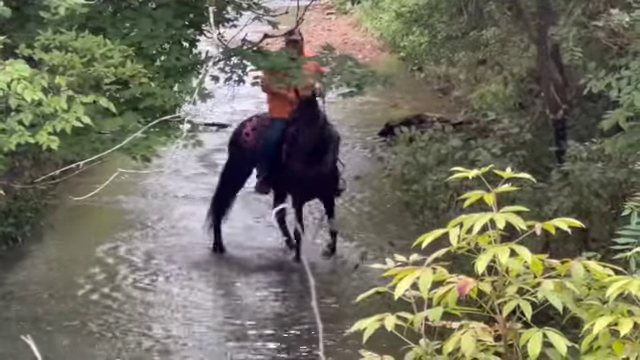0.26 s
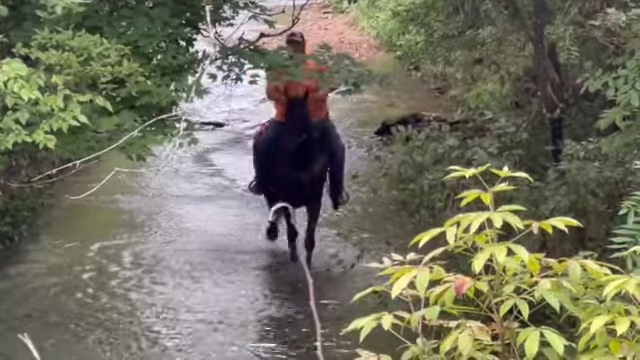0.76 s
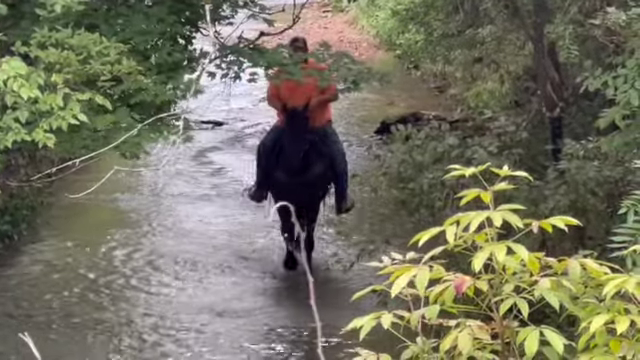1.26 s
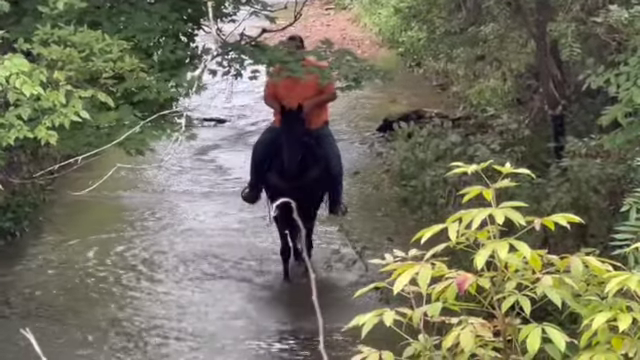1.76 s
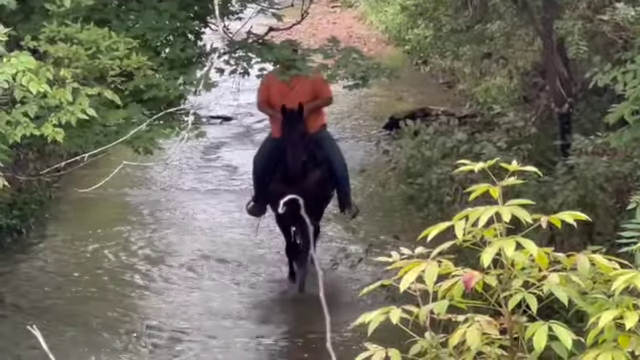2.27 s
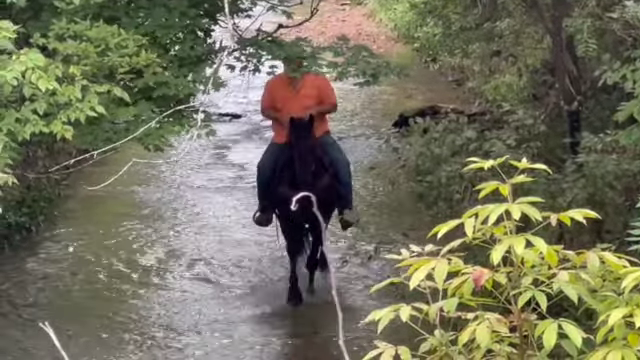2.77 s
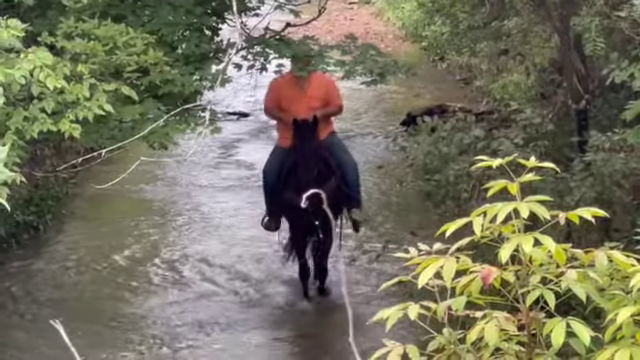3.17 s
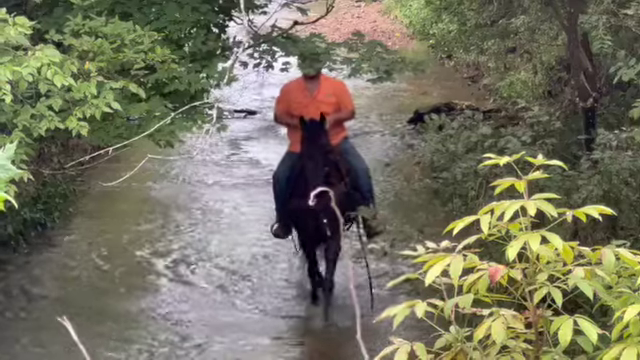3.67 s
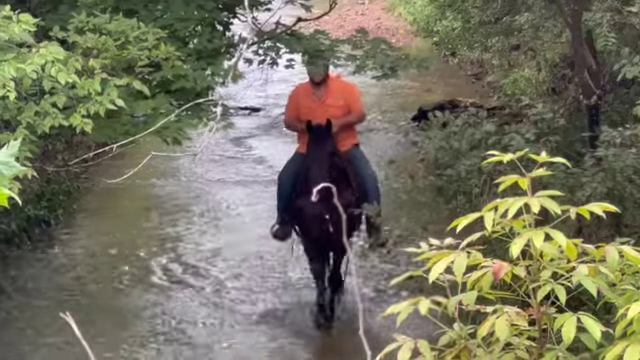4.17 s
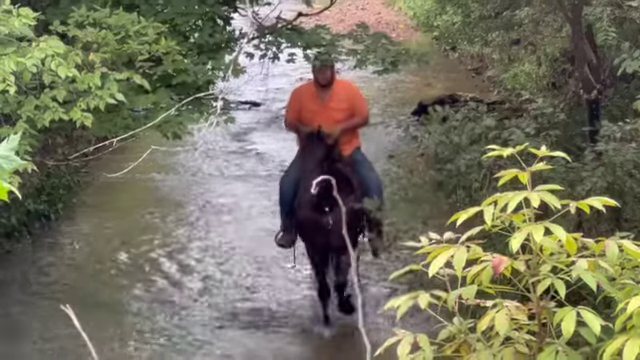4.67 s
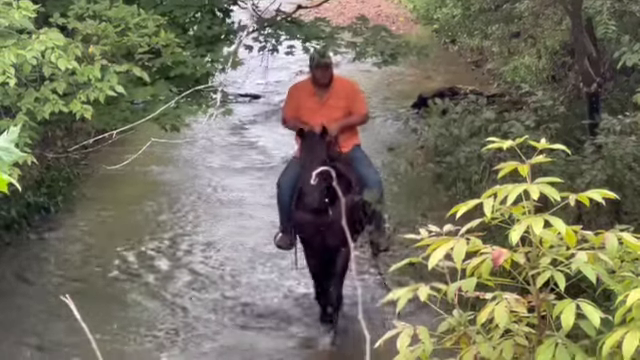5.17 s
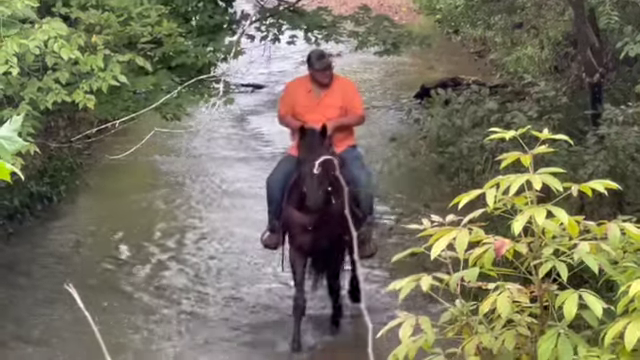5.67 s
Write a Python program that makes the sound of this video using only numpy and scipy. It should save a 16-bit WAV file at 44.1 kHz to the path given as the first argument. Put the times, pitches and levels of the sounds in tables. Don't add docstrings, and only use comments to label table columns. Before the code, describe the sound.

A horse walks through a shallow stony creek, hooves plopping and splashing over babbling water while insects drone steadily in the trees.

```python
import sys
import numpy as np
from scipy import signal
from scipy.fft import rfft, irfft, next_fast_len
from scipy.io import wavfile
from scipy.ndimage import uniform_filter1d

SR = 44100
rng = np.random.default_rng(int(sys.argv[2]) if len(sys.argv) > 2 else 0)


def gain_from_db(level_db):
    decades = np.asarray(level_db, float) / 20
    return 10 ** decades


def log_audio(samples):
    frames = np.atleast_2d(samples).T
    limited = np.clip(frames, -1, 1)
    pcm = np.round(limited * 32767).astype(np.int16)
    wavfile.write(sys.argv[1], SR, pcm)


N = 260631


def evened(x):
    return x / np.sqrt(np.mean(x ** 2) + 1e-20)


def wander(size):
    return evened(uniform_filter1d(uniform_filter1d(rng.standard_normal(N), size=size), size=size))


def read(points, hz):
    f, value = np.transpose(points)
    return np.interp(np.log(hz + 1), np.log(f + 1), value)


def add(mix, s, sound):
    part = mix[round(s * SR):][:len(sound)]
    part += sound[:len(part)]


def hiss(shape, patchy_db, flicker_db, size=512):
    # frequency in Hz, likeness of left and right from 0 to 1
    likeness = [(60, 0.99), (300, 0.94), (700, 0.91), (1400, 0.79), (2100, 0.93), (2700, 1), (3500, 0.99),
                (8500, 1), (9300, 0.95), (15000, 1)]
    frames, hz = 4 * N // size + 5, np.fft.rfftfreq(size, 1 / SR)
    a, b, c, d, patches = rng.standard_normal((frames, len(hz), 5)).T
    patches = uniform_filter1d(patches, size=6, axis=0)
    patches = evened(uniform_filter1d(patches, size=12, axis=1))
    flicker = evened(uniform_filter1d(rng.standard_normal(frames), size=4))
    same = np.clip(read(likeness, hz), 0, 1)[:, None]
    left = a + 1j * b
    right = same * left + np.sqrt(1 - same ** 2) * (c + 1j * d)
    level_db = read(shape, hz)[:, None] + patchy_db * patches + flicker_db * flicker
    z = np.array([left, right]) * gain_from_db(level_db)
    return evened(signal.istft(z, nperseg=size, noverlap=size - size // 4)[1][:, :N])


def ring(db, hz, t60, rise, attack_s):
    t = np.arange(round(1.5 * t60 * SR)) / SR
    shape = (1 - np.exp(-t / attack_s)) * gain_from_db(-60 * t / t60)
    turns = hz * (t + rise * t ** 2 / t60)
    return gain_from_db(db) * shape / shape.max() * np.sin(2 * np.pi * turns)


def rings(rows, rise=0, attack_s=0.001):
    out = np.zeros(N)
    for s, db, hz, t60 in rows:
        add(out, s, ring(db, hz, t60, rise, attack_s))
    return out


def pockets():
    # start in seconds, peak in dB, pitch in Hz, t60 in seconds
    slapped = [(0.0192, -19, 726, 0.015), (0.0205, -30, 584, 0.054), (0.1261, -21.5, 530, 0.028),
               (0.1278, -30, 730, 0.035), (0.1371, -20, 590, 0.0078), (0.8276, -26, 680, 0.031),
               (0.8277, -21.5, 1023, 0.039), (0.8334, -25.5, 856, 0.03), (1.2015, -26, 580, 0.0083),
               (1.5871, -25, 430, 0.021), (1.5974, -27, 594, 0.012), (2.3325, -26, 730, 0.019),
               (2.3463, -27, 507, 0.027), (2.5669, -27, 916, 0.05), (2.5669, -16.5, 512, 0.027),
               (2.5737, -21, 443, 0.034), (2.5801, -31, 505, 0.027), (2.9502, -18.5, 582, 0.035),
               (3.6078, -31, 562, 0.067), (3.6386, -21.5, 450, 0.012), (3.9668, -21.5, 587, 0.032),
               (3.9707, -34, 595, 0.017), (4.3514, -51, 578, 0.067), (4.368, -44, 468, 0.08),
               (4.987, -20.5, 526, 0.0052), (5.3293, -18, 694, 0.012), (5.3327, -30, 760, 0.011),
               (5.7506, -21.5, 530, 0.016), (5.766, -36, 745, 0.032), (4.9737, -35, 560, 0.071)]
    return rings(slapped, rise=-0.051)


def stones():
    # start in seconds, peak in dB, pitch in Hz
    knocks = [(0.017, -38, 1410), (0.0218, -31.5, 1290), (0.025, -33.5, 1500), (0.12, -31, 990),
              (0.1255, -25, 1070), (0.1356, -35, 930), (0.818, -30.5, 980), (0.832, -34.5, 1500),
              (1.2, -34, 1060), (1.203, -37, 1300), (1.2273, -43, 885), (1.5322, -34, 587),
              (1.5863, -31.5, 710), (1.5897, -29.5, 786), (2.332, -33.5, 1030), (2.5665, -30, 1520),
              (2.5677, -31, 1000), (2.574, -35, 1530), (2.5761, -24, 635), (2.9493, -21, 914),
              (2.9506, -33, 1240), (2.968, -29, 690), (2.978, -36, 1750), (3.9663, -37, 970),
              (3.9739, -29, 700), (4.347, -29.5, 1090), (0.828, -22, 994), (4.985, -28.5, 1550),
              (4.986, -27, 1220), (4.983, -43, 2130), (2.963, -39, 1010), (5.33, -28, 1110),
              (4.348, -52, 557)]
    bodies = [(s, db, hz, 0.016) for s, db, hz in knocks]
    edges = [(s, db - 22, hz * 2.18, 0.0048) for s, db, hz in knocks]
    return rings(bodies + edges)


def hollows():
    # start in seconds, peak in dB, pitch in Hz
    hums = [(2.37, -42, 271), (0.124, -36, 210), (0.444, -40, 360), (0.8281, -43, 328), (1.229, -34.5, 340),
            (1.591, -43, 290), (2.035, -40.5, 354), (2.335, -29.5, 353), (2.347, -31, 250),
            (2.576, -29, 198), (2.5772, -35, 336), (2.625, -38.5, 326), (2.968, -35, 393),
            (2.979, -36.5, 337), (3.455, -41.5, 375), (3.642, -38, 317), (3.9689, -27, 357),
            (3.9774, -30, 328), (4.351, -32.5, 232), (4.9868, -35.5, 348), (4.991, -34, 215),
            (5.01, -39, 343), (5.347, -37.5, 390), (3.996, -52, 350)]
    cycles = 22.4
    return rings([(s, db, hz, cycles / hz) for s, db, hz in hums], rise=-0.093)


def drips():
    # start in seconds, peak in dB, pitch in Hz
    falling = [(0.058, -38.5, 487), (0.716, -38, 474), (1.27, -39, 580), (1.292, -54, 610),
               (1.563, -39, 737), (1.905, -39, 492), (1.924, -37, 717), (2.3446, -36, 695),
               (2.5475, -31, 605), (2.5762, -36, 1080), (2.5801, -34, 700), (2.6234, -37, 530),
               (2.713, -36, 388), (2.949, -44, 457), (2.984, -42, 660), (3.0644, -35, 560),
               (2.735, -42, 545), (3.6384, -32.5, 857), (3.949, -36, 690), (3.956, -39, 880),
               (3.9793, -48, 610), (4.642, -34, 490), (4.665, -38.5, 510), (4.727, -36.5, 470),
               (4.7839, -31.5, 484), (4.9667, -33, 636), (5.0234, -33, 550), (5.1846, -35.5, 566),
               (5.345, -37, 634), (5.742, -39, 470)]
    # start in seconds, peak in dB, pitch in Hz
    trickles = [(0.057, -45, 1510), (0.26, -46, 1510), (0.319, -54, 2520), (0.887, -49.9, 2500),
                (1.112, -41, 1370), (1.132, -48.2, 2300), (1.162, -46, 300), (1.265, -48, 2070),
                (1.398, -50.9, 2580), (1.413, -46, 2000), (1.877, -42, 1640), (1.911, -43, 1080),
                (1.997, -38, 780), (1.998, -40, 305), (2.002, -53, 2480), (2.111, -48.5, 2280),
                (2.182, -41, 665), (2.236, -45, 1790), (2.291, -45.8, 1770), (2.343, -50, 1740),
                (2.518, -41, 302), (2.583, -44, 1280), (2.938, -41, 1590), (2.95, -45, 2000),
                (3.146, -40.2, 480), (3.308, -50, 1250), (3.397, -41, 300), (3.452, -48, 2080),
                (3.603, -41.8, 1720), (3.617, -41, 2170), (3.779, -39, 1150), (3.8, -40, 1440),
                (3.998, -42.4, 1810), (4.046, -39, 340), (4.245, -45.4, 1830), (4.557, -43, 296),
                (4.596, -46, 2500), (4.781, -36, 740), (4.813, -46.9, 1930), (4.895, -47, 2250),
                (4.9, -47.0, 1950), (4.91, -42, 1830), (4.983, -47, 2130), (5.113, -37.5, 540),
                (5.129, -38.5, 950), (5.162, -42, 1770), (5.184, -45, 2480), (5.191, -40, 302),
                (5.265, -44, 2130), (5.38, -42.7, 300), (5.418, -43, 300), (5.445, -40, 685),
                (5.497, -50, 2200), (5.542, -48, 1450), (5.661, -41, 750), (5.761, -39, 1660),
                (5.781, -43, 1890), (5.87, -44, 2300)]
    rows = [(s, db, hz, 0.043) for s, db, hz in falling]
    return rings(rows + [(s, db, hz, 0.029) for s, db, hz in trickles])


def blips():
    # start in seconds, peak in dB, pitch in Hz
    bubbles = [(0.143, -31, 620), (0.157, -36, 1500), (0.21, -35, 447), (0.309, -39, 1440),
               (0.384, -36, 1080), (0.548, -39, 1700), (0.69, -45, 1510), (0.716, -37, 1520),
               (1.229, -30.5, 920), (1.292, -41, 710), (1.532, -34, 875), (1.594, -40, 850),
               (1.586, -38, 1200), (1.588, -36, 1600), (1.534, -41, 1440), (2.158, -39, 1750),
               (2.302, -36, 800), (2.354, -31, 525), (2.398, -42, 640), (2.508, -35, 1440),
               (2.589, -38, 347), (3.284, -33, 870), (3.292, -38, 990), (3.296, -46, 1580),
               (3.299, -32.5, 510), (3.537, -52, 1520), (3.59, -39, 1650), (3.612, -42, 1700),
               (3.62, -36, 2200), (3.645, -39, 1500), (0.828, -37, 2100), (2.951, -44, 1980),
               (3.635, -38, 424), (3.747, -36, 1130), (3.874, -37, 1040), (3.986, -41, 710),
               (4.195, -32.5, 1590), (4.353, -33, 560), (4.368, -32, 517), (4.378, -32, 520),
               (4.406, -37, 1400), (4.416, -38, 450), (4.484, -36, 1280), (4.562, -42, 1590),
               (4.587, -33, 1160), (4.8, -38, 1600), (4.874, -37.5, 1060), (1.1, -46, 845),
               (1.049, -38.5, 497), (4.961, -38, 930), (4.98, -40, 1900), (4.993, -43, 1010),
               (5.188, -33, 1040), (5.24, -31.5, 1140), (5.678, -33, 1120), (5.734, -36, 1230),
               (5.742, -35, 1500), (5.769, -33, 750), (5.78, -37, 800), (5.809, -40, 447),
               (5.813, -32, 1660), (5.821, -33, 1150)]
    cycles = 10.8
    return rings([(s, db, hz, cycles / hz) for s, db, hz in bubbles], rise=0.028, attack_s=0.00042)


def gulp(db, hz, length, rise):
    u = np.linspace(0, 1, round(length * SR))
    turns = np.cumsum(hz * (1 + rise * u ** 4)) / SR
    return gain_from_db(db) * signal.windows.tukey(len(u), .7) * np.sin(2 * np.pi * turns)


def cavities():
    # start in seconds, peak in dB, pitch in Hz, length in seconds,
    # late pitch rise as a share
    gulps = [(.123, -44, 180, 0.038, 0.21), (.493, -48.5, 130, 0.047, 1.9), (1.196, -42, 162, 0.022, 0.8),
             (1.64, -47, 87, 0.047, 0.82), (2.0, -42, 125, 0.032, 0.88), (2.567, -35.5, 118, 0.033, 1.1),
             (3.041, -47, 111, 0.068, 0), (3.366, -42, 73, 0.063, 2), (3.448, -46, 144, 0.042, 0.07),
             (3.965, -45.5, 162, 0.023, 0), (4.343, -45.5, 109, 0.034, 1.2), (4.655, -51, 143, 0.036, 0.72),
             (4.943, -42, 113, 0.04, 0.7), (5.324, -41, 165, 0.019, 0.5), (5.808, -47, 101, 0.079, 1.2)]
    # start in seconds, peak in dB, pitch in Hz, length in seconds,
    # late pitch rise as a share
    sinks = [(0.8315, -27, 430, .025, -.12), (0.8555, -38, 335, .014, -.1), (2.314, -40, 430, .016, -.05),
             (5.770, -38, 370, .019, -.2), (2.992, -41, 310, .02, -.05), (2.599, -39, 500, .012, .2),
             (1.63, -39, 500, .012, .1), (0.439, -42, 430, .012, -.2), (5.7525, -30, 430, .015, -.08),
             (3.655, -42, 390, .03, .5), (3.36, -46, 170, .022, -.5)]
    # start in seconds, peak in dB, pitch in Hz, length in seconds,
    # late pitch rise as a share
    bursts = [
        (4.478, -46, 1193, .02, 2.3),
    ]
    out = np.zeros(N)
    for rows in (gulps, bursts, sinks):
        for s, *cavity in rows:
            add(out, s, gulp(*cavity))
    return out


def banks(x, wet_db, t60):
    t = np.arange(SR // 4) / SR
    signs = rng.choice([-1., 1.], (2, len(t)))
    present = rng.random((2, len(t))) < 2000 / SR
    taps = signs * present * (t > .003) * gain_from_db(-60 * t / t60)
    taps = 0.88 * taps[:1] + 0.35 * taps
    scatter = signal.oaconvolve(x[None], taps / np.linalg.norm(taps[0]), axes=1)[:, :N]
    return x + gain_from_db(wet_db) * scatter


def hooves():
    struck = pockets() + hollows() + stones() + drips() + blips()
    struck = signal.lfilter(*signal.iirnotch(205, 2.2, SR), struck)
    return banks(struck + cavities(), wet_db=-13, t60=.16)


def splashes():
    # start in seconds, level in dB, t60 in seconds
    sheets = [(0.022, -37, 0.3), (0.126, -39, 0.25), (0.826, -31, 0.12), (1.2003, -34, 0.081),
              (1.2264, -48, 0.17), (1.534, -40, 0.046), (1.5875, -45, 0.11), (1.9964, -53, 0.13),
              (2.3321, -42, 0.087), (2.567, -38, 0.29), (2.948, -34.5, 0.31), (3.2824, -42, 0.1),
              (3.639, -32.5, 0.065), (3.9664, -32.5, 0.088), (4.345, -39.5, 0.41), (4.577, -42, 0.53),
              (4.9853, -34, 0.14), (5.3266, -38, 0.21), (5.7476, -37.5, 0.17)]
    # start in seconds, peak in dB
    slaps = [(0.208, -40), (0.261, -44), (0.384, -41), (0.579, -22), (0.717, -25), (1.104, -50),
             (1.29, -24), (1.531, -34), (1.9, -25), (1.999, -29), (2.072, -21.5), (2.396, -46),
             (2.696, -30), (2.729, -44), (2.825, -24), (3.282, -35), (3.297, -27), (3.461, -27),
             (3.62, -40), (4.041, -25), (4.346, -42), (4.409, -47), (4.488, -31), (4.641, -34),
             (5.138, -25), (5.183, -26), (5.245, -27.5), (5.416, -28), (5.68, -30), (5.815, -29)]
    # frequency in Hz, level in dB per Hz
    droplets = [(200, -49), (350, -3.5), (700, 0.5), (1500, -8), (2200, -15), (3000, -17.5), (6000, -27),
                (11000, -65)]
    level = np.zeros(N)
    for s, db, t60 in sheets + [(s, db - 10.5, 0.035) for s, db in slaps]:
        t = np.arange(round(t60 * SR)) / SR
        add(level, s, gain_from_db(db - 60 * t / t60) * (1 - np.exp(-t / 0.0018)))
    return gain_from_db(-1.0) * level * hiss(droplets, patchy_db=2.0, flicker_db=0.0, size=256)


def babble(per_s, spread_db):
    # bubble pitch in Hz, level in dB
    sizes = [(260, -4.5), (400, 0), (600, -4), (900, -5), (1500, -11), (2600, -18.5)]
    out = np.zeros((2, N))
    pitches = np.geomspace(260, 2600, num=28)
    clumps = gain_from_db(3.6 * wander(1500))
    clumps /= clumps.mean()
    for hz in pitches:
        loudness = gain_from_db(spread_db * np.minimum(rng.exponential(1, N), 2.6))
        train = loudness * (rng.random(N) < clumps * per_s / len(pitches) / SR)
        bubble = hz / 600 * ring(read(sizes, hz), hz, 13.2 / hz, rise=0.12, attack_s=0.0011)
        balance = gain_from_db(rng.normal(0, 1.0, (2, 1)))
        out += signal.oaconvolve(train, bubble)[:N] * balance
    return evened(out)


def flings():
    # middle of the swing in seconds, level in dB over the calm spray
    swings = [(.05, 3), (.27, 2.5), (.82, 3), (1.4, 3.5), (1.8, 2), (2.22, 3), (2.36, 0.5), (2.58, 3.5),
              (2.75, 4), (2.9, 6.5), (3.05, 2.5), (3.61, 6), (3.92, 5), (4.2, 3.5), (4.46, 7), (4.62, 1),
              (5.0, 4.5), (5.17, 9), (5.7, 7), (5.8, 3.5)]
    half_width_s = 0.074
    t = np.arange(N) / SR
    db = sum(db * np.exp(-((t - s) / half_width_s) ** 2) for s, db in swings)
    return db - db.mean()


def creek():
    # time in seconds, babble in dB
    stir = [(0, -55), (.18, -49), (.35, -51), (1.04, -53), (1.23, -47.5), (1.4, -53.5), (1.61, -47.5),
            (1.76, -52.5), (2.11, -52), (2.34, -49), (2.5, -48.5), (2.93, -51.5), (3.32, -48.5),
            (3.45, -52.5), (3.77, -48), (4.62, -54), (5.15, -48.5), (5.91, -51.5)]
    # frequency in Hz, level in dB per Hz
    wash_shape = [(120, -23), (210, -7.5), (330, -10), (580, 1), (900, -1), (1220, -2), (1550, 0),
                  (2100, -6), (2700, -20.5), (4000, -36), (9000, -64)]
    # frequency in Hz, level in dB per Hz
    spray_shape = [(1500, -8), (2600, 0), (4100, -3), (5600, -4), (7800, -7), (8800, -7.5), (10000, -9.5),
                   (11800, -15), (14000, -17.5), (14800, -18), (15700, -29)]
    stir_s, level_db = np.transpose(stir)
    stir_db = np.interp(np.arange(N) / SR, stir_s, level_db)
    stir_db = stir_db - stir_db.mean()
    burst_db = flings()
    wash = gain_from_db(-48.5 + 0.062 * stir_db) * hiss(wash_shape, patchy_db=2.0, flicker_db=0.4)
    bubbles = gain_from_db(-53.5 + 1.73 * stir_db) * babble(per_s=900, spread_db=3.0)
    spray = gain_from_db(-52.5) * hiss(spray_shape, patchy_db=1.16, flicker_db=0.7, size=256)
    hz = np.fft.rfftfreq(N, 1 / SR)
    mist = irfft(rfft(spray) / (1 + (9000 / (hz + 1)) ** 8), N)
    coarse = spray - mist
    gusts_db = 1.3 * wander(2500)
    return wash + bubbles + gain_from_db(.22 * burst_db) * coarse + gain_from_db(.9 * burst_db + gusts_db) * mist


def resonate(x, hz, width):
    b, a = signal.iirpeak(hz, hz / width, SR)
    return signal.lfilter(b, a, signal.lfilter(b, a, x))


def insects(count, clicks_hz, throb_hz, depth):
    # pitch in Hz, width in Hz, level in dB
    tymbals = [(6564, 570, -0.5), (6853, 620, 2), (7090, 290, -2.5)]
    t, near = np.arange(N) / SR, np.zeros(N)
    for k in range(count):
        drift = 1 + .12 * evened(uniform_filter1d(rng.standard_normal(N), size=300))
        rate = clicks_hz * rng.uniform(.85, 1.15) * drift
        clicks = np.diff(np.floor(np.cumsum(rate) / SR), prepend=0)
        throb = 1 + depth * np.sin(2 * np.pi * (throb_hz * rng.uniform(1.0, 1.03) * t + rng.random()))
        hz, width, db = tymbals[k % len(tymbals)]
        near += gain_from_db(db) * evened(resonate(clicks * throb * rng.uniform(0.13, 1, N), hz, width))
    far = np.zeros(N)
    for hz, width, db in tymbals:
        far += gain_from_db(db) * evened(resonate(rng.standard_normal(N), hz, width))
    return gain_from_db(-46) * evened(0.49 * evened(near) + 0.99 * evened(far))


def rumble():
    # frequency in Hz, level in dB per Hz
    hum = [(18, -35), (32, -18), (50, 8), (75, 4.5), (125, -0.5), (180, -7), (260, -14), (500, -47),
           (3000, -80)]
    return gain_from_db(-56) * hiss(hum, patchy_db=2.5, flicker_db=-1.0, size=2048)


def scene():
    water = hooves() + splashes() + creek()
    return water + insects(count=6, clicks_hz=180, throb_hz=39.8, depth=0.24) + rumble()


def band_limit(x):
    return signal.sosfilt(signal.butter(12, 15730, fs=SR, output="sos"), x)


def record(dry):
    # frequency in Hz, left minus right in dB
    lean = [(60, -0.5), (200, -1.5), (380, -0.1), (700, -1.7), (1300, -0.5), (2200, 1), (3000, 0)]
    # frequency in Hz, phase between the microphones in radians
    phase = [(150, 0), (700, -.22), (1300, -.1), (2400, 0), (8750, 0), (9300, 1.9), (10150, 3.14),
             (11200, 5.2), (12200, 6.28), (13100, 8.3), (13900, 9.42), (14700, 11.4), (15400, 12.56)]
    size = next_fast_len(N)
    hz = np.fft.rfftfreq(size, 1 / SR)
    left = gain_from_db(read(lean, hz) / 2) * np.exp(-.5j * read(phase, hz))
    passed = (hz < 15750) / (1 + (38 / (hz + 1)) ** 4)
    ports = np.array([left, 1 / left]) * passed
    mix = irfft(rfft(dry, size) * ports, size)[:, :N]
    return band_limit(mix)


dry = scene()
out = record(dry)
log_audio(out)
```